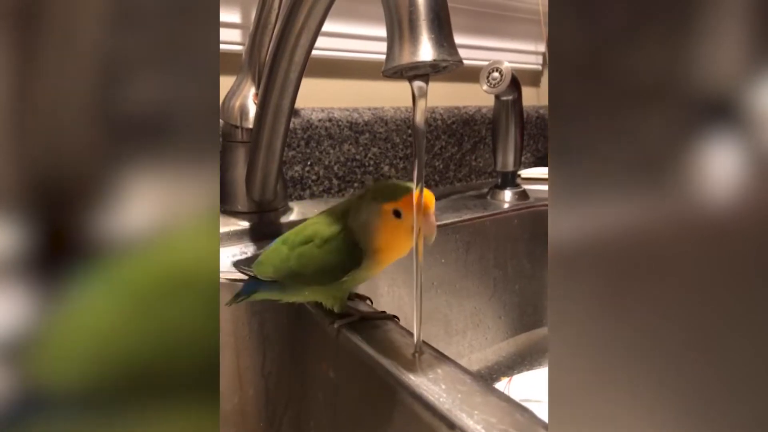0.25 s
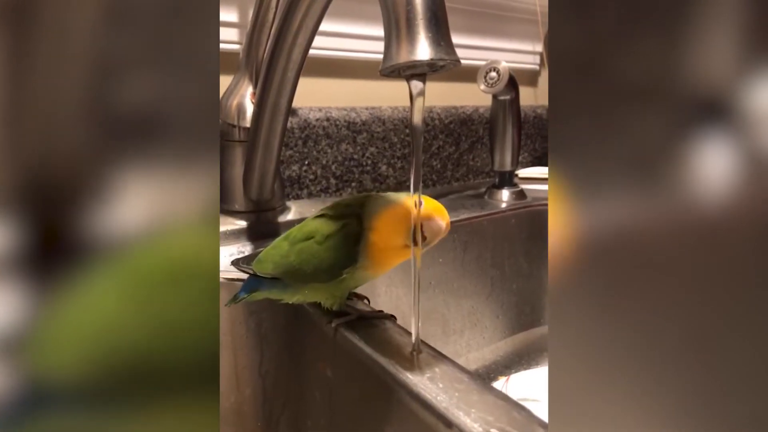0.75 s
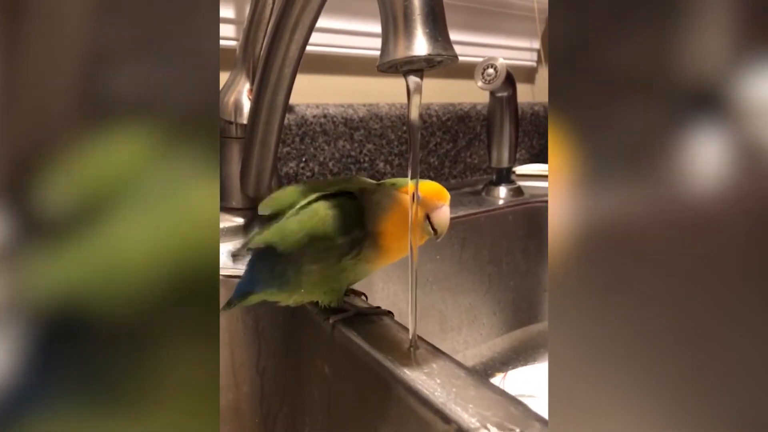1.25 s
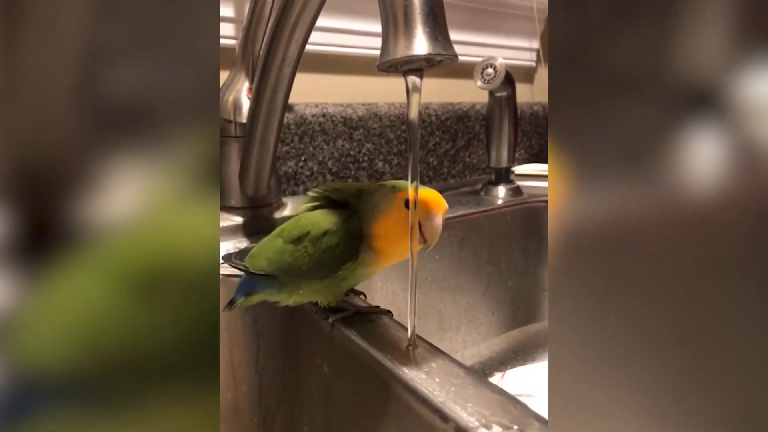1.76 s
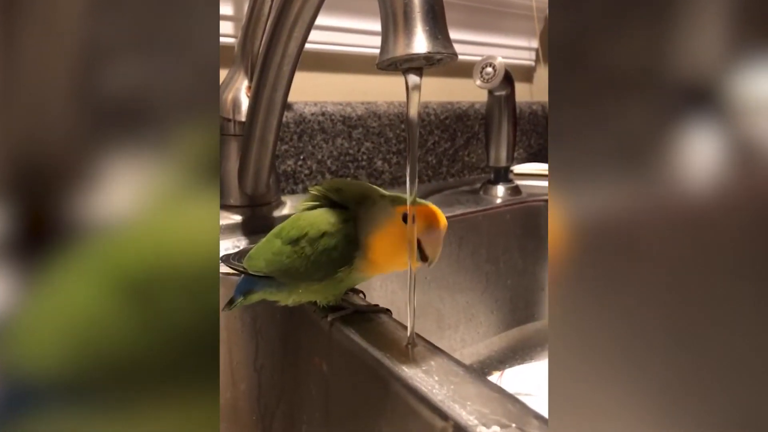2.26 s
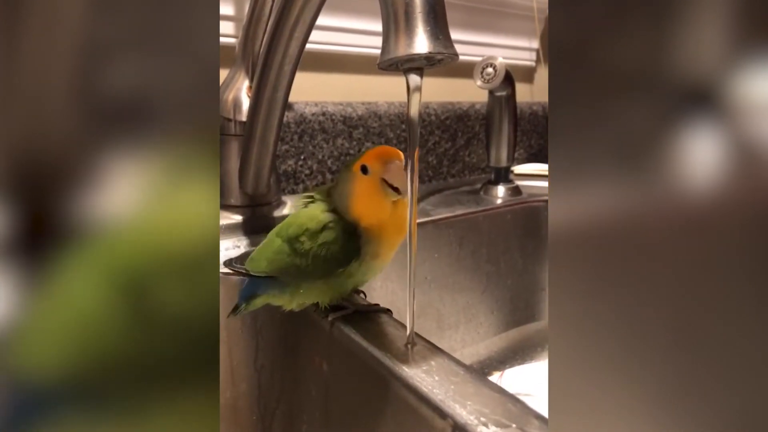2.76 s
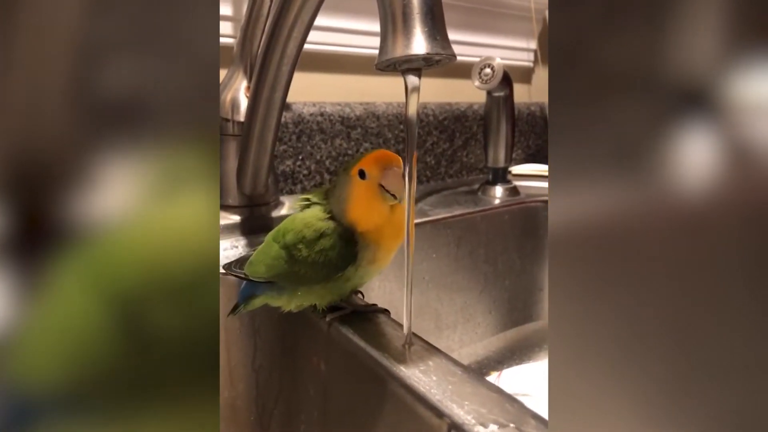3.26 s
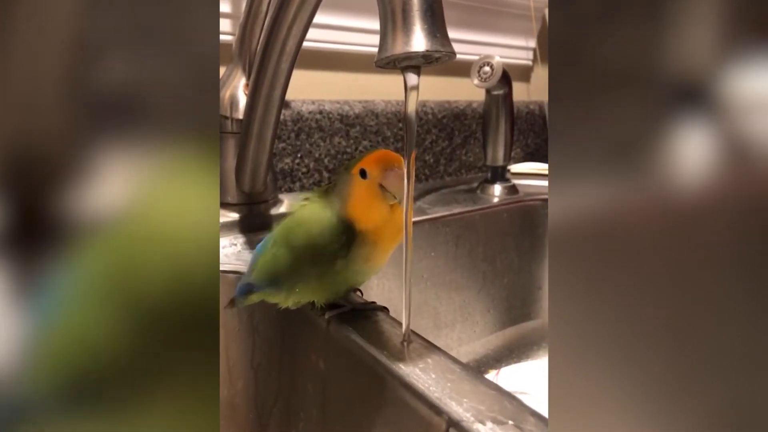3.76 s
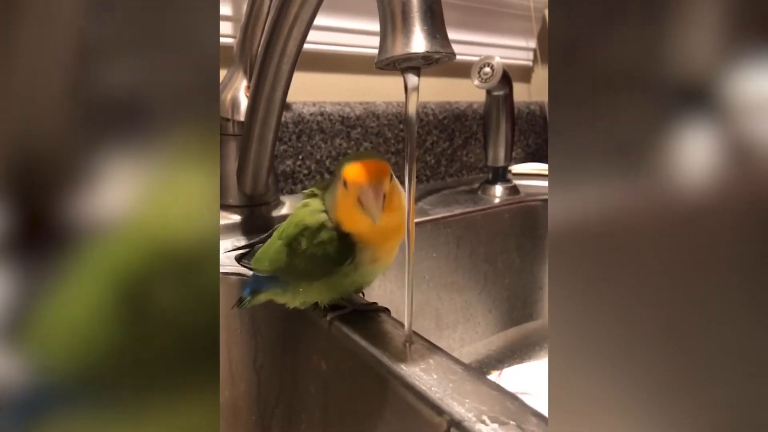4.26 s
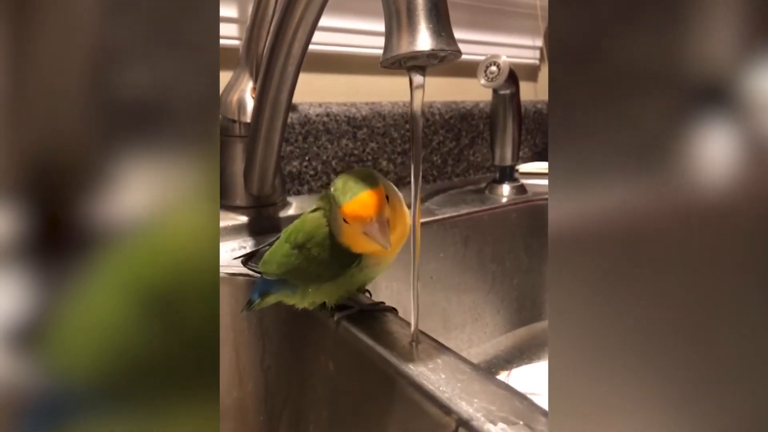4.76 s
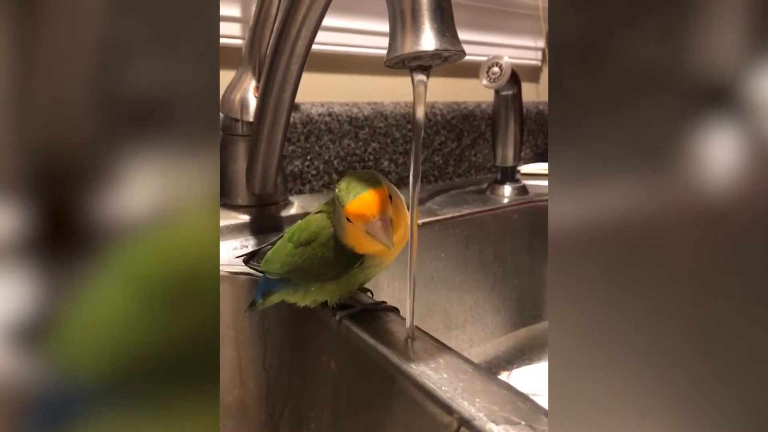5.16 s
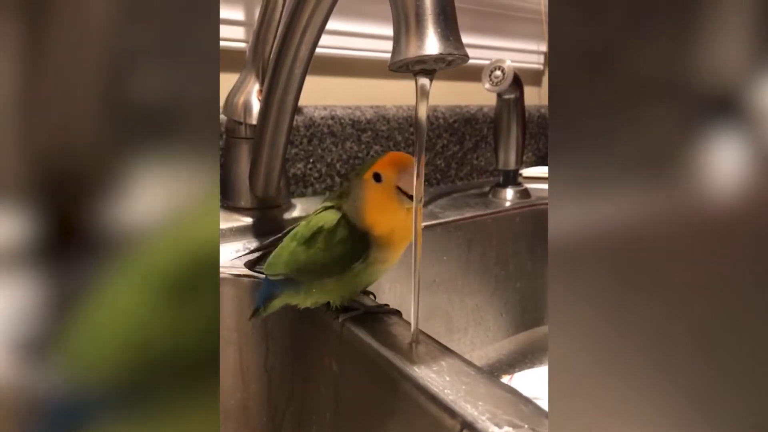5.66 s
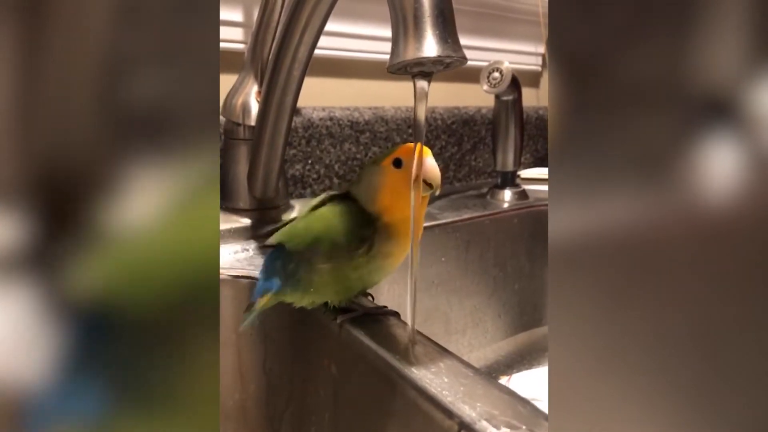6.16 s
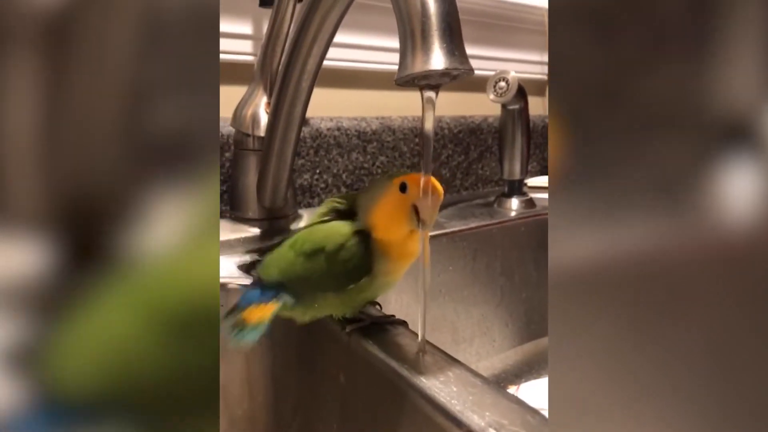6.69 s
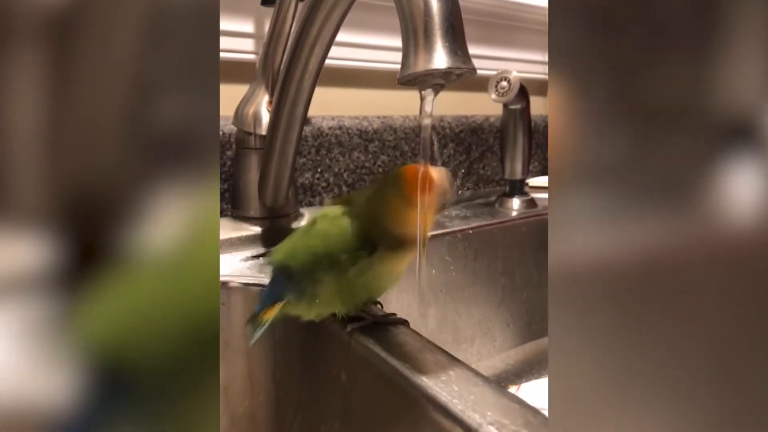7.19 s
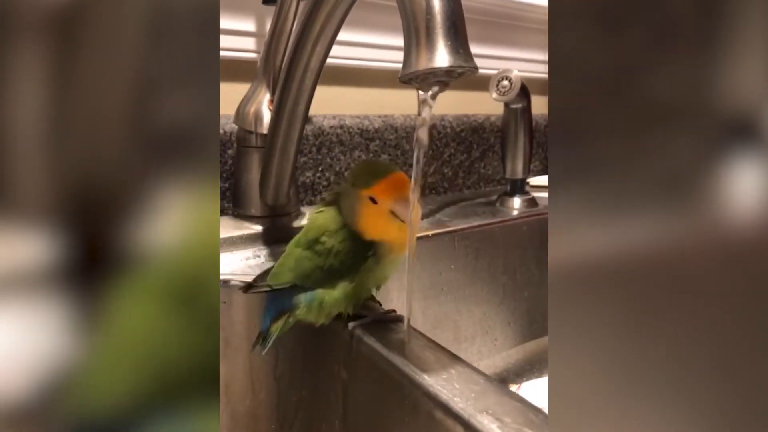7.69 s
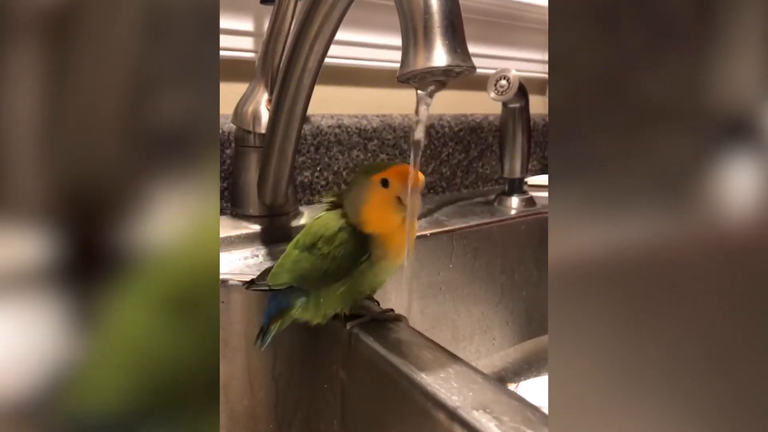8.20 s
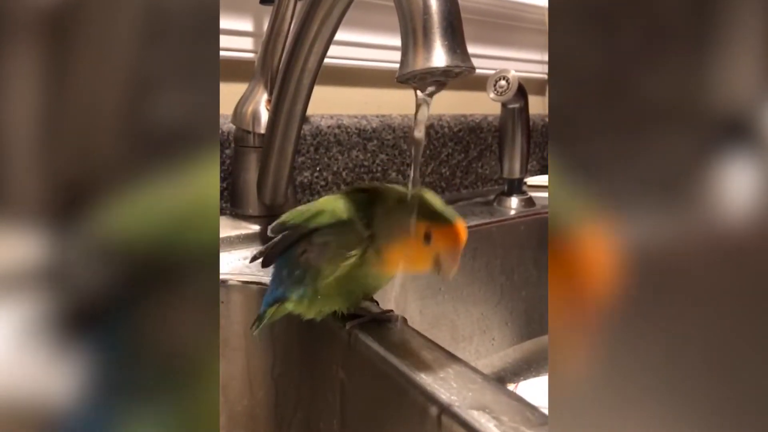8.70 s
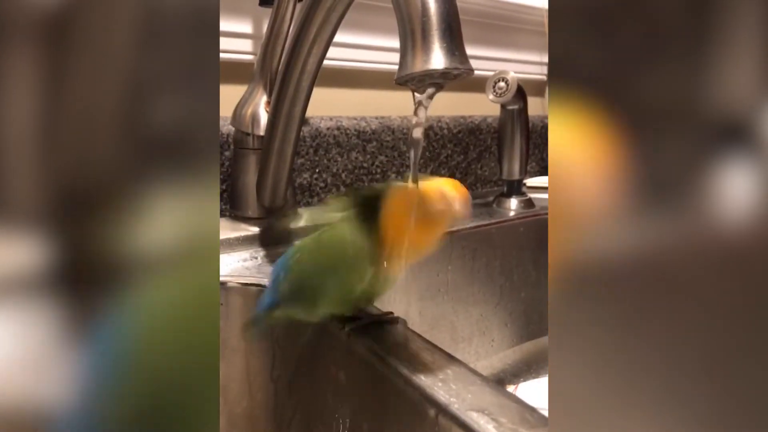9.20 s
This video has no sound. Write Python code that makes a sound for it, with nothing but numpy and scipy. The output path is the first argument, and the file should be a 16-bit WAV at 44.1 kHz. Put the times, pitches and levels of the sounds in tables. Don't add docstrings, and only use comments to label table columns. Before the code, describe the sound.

A thin tap stream runs on a steel kitchen sink rim, picked up close by a muffled camera microphone, so water is mostly low rumble around 20 to 50 Hz with dull, soft patter and very faint hiss. Jolts of the steel become short thumps sweeping quickly from mid to low pitch, like a blunt pew. Small ones come at 0.4 and 1.2 s, firmer ones at 1.7 and 2.1, a hard one at 2.9, another at 3.9, the hardest at 4.2. From 4.2 to 7.0 they crowd irregularly, notably 4.8, 5.35, 5.65, 6.3, 6.45 and 6.75. Hiss jumps for about 60 ms after several hard blows, longer at 6.6. Rumble swells around 6.5, then eases; thumps return at 8.15 and 8.3, with light bumps after. Tiny ticks at 0.75 and 2.24; at 9.2 a tick and brief dropout, then quiet rumble.

```python
import sys
import numpy as np
from scipy import signal
from scipy.fft import rfft, irfft, next_fast_len
from scipy.io import wavfile
from scipy.ndimage import uniform_filter1d, minimum_filter1d, map_coordinates

SR = 44100
rng = np.random.default_rng(int(sys.argv[2]) if len(sys.argv) > 2 else 0)


def ratio_of_db(decibels):
    return 10 ** (np.asarray(decibels, float) / 20)


def materialize(psi):
    bounded = np.clip(np.atleast_2d(psi).T, -1, 1)
    quanta = np.round(bounded * 32767).astype(np.int16)
    wavfile.write(sys.argv[1], SR, quanta)


N = 416304


def unit(x):
    return x / np.sqrt(np.mean(x ** 2) + 1e-20)


def along(points, hz):
    f, v = np.transpose(points)
    return np.interp(np.log(hz + 1), np.log(f + 1), v)


def filtered(x, response):
    size = next_fast_len(N + SR // 2)
    hz = np.fft.rfftfreq(size, 1 / SR)
    return irfft(rfft(x, size) * response(hz), size)[:N]


def noise(spectrum):
    white = rng.standard_normal(N)
    return unit(filtered(white, lambda hz: ratio_of_db(along(spectrum, hz))))


def bump(t, ms, order=1):
    u = np.maximum(t, 0) / (ms / 1000)
    return (u * np.exp(1 - u)) ** order


# pitch_hz, level_db
PORT = [(15, -1.3), (40, 1.8), (100, 1), (250, 1.68), (480, -2.1), (650, -7.5), (900, -1), (1600, -6),
        (2600, -14)]


def pickup(hz, bass_hz=41, damping=1.274, top_hz=300):
    s = 1j * hz
    bass = s * s / (s * s + s * bass_hz * damping + bass_hz ** 2)
    top = (top_hz / (top_hz + s)) ** 4
    return bass * top * ratio_of_db(along(PORT, hz))


# start_s, pull_db, pull_rise_ms, slow_push_height (signed)
BREAKS = [(0.4007, -40, 0.3, -.072), (1.201, -28, 0.33, .16), (1.286, -20, 0.72, -0.022),
          (1.6598, -4.5, 2.5, 0.00042), (2.0853, -4, 2.15, -0.21), (2.9446, 0.1, 0.96, 0.48),
          (3.3455, -21.5, 2.6, -.087), (3.4177, -33.5, 2.1, -.033), (3.8804, -9.5, 0.37, 0.4),
          (4.2184, 2.9, 1.2, 0.64), (4.247, -7.5, 2.9, 0.12), (4.3024, -17, 2.4, -0.23),
          (4.6104, -8, 3.3, -0.073), (4.8325, 1, 0.44, 0.0082), (4.856, -2, 0.33, -0.17),
          (5.1012, -7.5, 0.78, 0.046), (5.128, -16, 0.62, -0.12), (5.3487, -0.8, 0.43, 0.15),
          (5.486, -4.5, 0.77, -0.014), (5.6585, -3, 1.7, -0.18), (5.786, -10.5, 0.92, -0.11),
          (6.3003, -23, .21, .016), (6.3178, -1, 0.57, -0.38), (6.4071, -12.5, 0.34, 0.25),
          (6.4373, -2, 2.9, -0.53), (6.6798, -27, .58, .1), (6.748, -4, 0.62, 0.26),
          (7.025, -15.5, 2.9, -0.28), (8.1553, -2.5, 3.3, -0.41), (8.281, -4.5, 3, 0.093)]
# start_s, pull_db,
# slow_push_height (signed), rim_knock_db
WEAK_BREAKS = [(0.021, -57, -0.23, -48.5), (0.7006, -28.5, 0.015, -62), (0.945, -36.5, 0.1, -66),
               (1.7108, -46, -0.1, -66), (2.9131, -35.5, -0.073, -56.5), (3.5827, -40.5, 0.027, -59),
               (4.1896, -24.5, 0.23, -44.5), (4.3944, -27.5, 0.044, -47.5), (4.4386, -32.5, -0.021, -50.5),
               (4.4992, -31, -0.014, -49), (4.5738, -40, .053, -64), (4.9847, -37.5, 0.11, -73),
               (6.0504, -40, 0.1, -51), (6.532, -34, 0.19, -60), (6.5621, -28, 0.4, -60),
               (7.0969, -34, 0.02, -42), (7.133, -29, 0.08, -63), (7.176, -56, .01, -54),
               (7.206, -45.5, .01, -57), (7.1381, -44.5, 0.23, -67), (8.2614, -27.5, 0.066, -61),
               (8.3638, -31, 0.00034, -66.5), (8.4869, -35.5, 0.031, -67), (8.5185, -25.5, 0.1, -63),
               (8.631, -36.5, 0.027, -60), (9.1037, -36, -0.12, -66)]


def contacts(weak_rise_ms=1.3):
    return BREAKS + [(s, db, weak_rise_ms, push) for s, db, push, _ in WEAK_BREAKS]


def jolts(slow_ms=5.08):
    out, steps = np.zeros(N + SR), np.arange(SR // 10)
    for s, pull_db, rise_ms, push in contacts():
        start = int(s * SR)
        t = (start + steps) / SR - s
        pull = ratio_of_db(pull_db) * bump(t, rise_ms)
        out[start:][:len(t)] -= pull + push * bump(t, slow_ms, order=2)
    return filtered(out[:N], pickup)


def knocks(rows, cycles):
    out, t = np.zeros(N), np.arange(SR // 30) / SR
    for s, db, hz in rows:
        swell = bump(t, 1000 * cycles / hz, order=2)
        out[round(s * SR):][:len(t)] -= ratio_of_db(db) * swell * np.sin(2 * np.pi * hz * t)
    return out


# start_s, peak_db, pitch_hz
KNOCKS = [(0.006, -43, 330), (0.4008, -45, 287), (1.2858, -44.5, 380), (1.6598, -27, 232),
          (2.0862, -24.5, 284), (2.9455, -17.5, 263), (3.3456, -43.5, 250), (3.4209, -48.5, 237),
          (3.8821, -25, 277), (4.2193, -16, 264), (4.2485, -36, 294), (4.3032, -32.5, 256),
          (4.6118, -41.5, 334), (4.8335, -31, 298), (4.8563, -28.5, 272), (5.1029, -42, 325),
          (5.1276, -40.5, 356), (5.4861, -35, 417), (5.6626, -24, 262), (6.3177, -23, 348),
          (6.4071, -49, 373), (6.4357, -32.5, 350), (6.558, -44.5, 520), (6.7469, -36.5, 420),
          (7.0232, -39, 360), (7.1389, -43, 273), (8.1567, -24.5, 263), (8.2812, -28, 366),
          (8.367, -37.5, 312), (8.5197, -41, 247)]
# start_s, peak_db, pitch_hz
CRACKS = [(0.024, -55, 845), (1.658, -67, 840), (2.085, -46, 800), (2.085, -62, 1620), (2.944, -43.5, 850),
          (3.882, -58, 850), (3.882, -59, 1650), (4.218, -42.5, 860), (4.303, -58, 850), (4.609, -48, 507),
          (4.832, -52, 850), (4.854, -69.5, 857), (5.348, -71.5, 850), (5.486, -56.5, 854),
          (5.662, -58.5, 785), (6.318, -50.5, 850), (6.436, -62, 850), (6.747, -59, 850), (7.023, -62, 850),
          (7.133, -60, 700), (8.156, -64, 800), (8.28, -65.5, 850)]


def rim(weak_knock_hz=350, dull_hz=620):
    rows = KNOCKS + [(s, db, weak_knock_hz) for s, *_, db in WEAK_BREAKS]
    dull = filtered(knocks(rows, cycles=0.55), lambda hz: 1 / np.sqrt(1 + (hz / dull_hz) ** 6))
    return dull + knocks(CRACKS, cycles=1.0)


def sway(depth_db=1.92, per_second=14):
    knots = rng.standard_normal(200)
    return depth_db * map_coordinates(knots, [np.arange(N) * per_second / SR])


# start_s, force_db, spray_over_force_db
FLOW = [(0.0, -27.5, -23.5), (0.42, -34, -24.5), (1.08, -35, -15.5), (1.84, -32.5, -30.5),
        (2.44, -35, -19.5), (2.76, -33.5, -23.5), (3.92, -35.5, -22), (4.23, -34.5, -21.5),
        (5.73, -33.5, -22), (6.1, -36.5, -16), (6.31, -38, -6.5), (6.52, -25, -18.5), (7.13, -31.5, -19),
        (7.31, -35, -17), (7.94, -34.5, -23.5), (8.23, -34.5, -22), (8.68, -37.5, -18), (9.44, -38.5, -10)]


def flow(per_second=90, spread_db=1.8, ms=.9):
    s, force_db, spray_db = np.transpose(FLOW)
    t = np.arange(N) / SR
    draw = rng.random((1500, 2))
    when = np.cumsum(-np.log(draw[:, 0]) / per_second)
    size = ratio_of_db(-spread_db * np.log(draw[:, 1])) * (when < N / SR)
    places = np.minimum(when * SR, N - 1).astype(int)
    drops = np.bincount(places, -size, N)
    patter = filtered(signal.fftconvolve(drops, bump(t[:2048], ms))[:N], pickup)
    level_db = np.interp(t, s, force_db + spray_db) + sway() - 5.0
    return ratio_of_db(level_db) * unit(patter)


def steadied(x, firmness):
    power = uniform_filter1d(uniform_filter1d(x ** 2, size=1800), size=1800)
    level = np.sqrt(np.abs(power) + 1e-9)
    return unit(x / level ** firmness)


# pitch_hz, level_db (per Hz)
RUMBLE = [(7, -39), (12, -8.5), (20, -1.5), (30, -0.4), (41, 1.5), (55, -6.5), (75, -17.5), (105, -22),
          (140, -28.5), (265, -50.5), (600, -64.5), (800, -88), (1300, -120)]


def rumble(ceiling_db=-22, shudder_db=-26, shudder_ms=24):
    s, force_db, _ = np.transpose(FLOW)
    t = np.arange(N) / SR
    shudder = sum(ratio_of_db(db + shudder_db) * bump(t - when, shudder_ms) for when, db, *_ in BREAKS)
    steady = ratio_of_db(np.interp(t, s, force_db) + sway())
    level = np.minimum(np.hypot(steady, shudder), ratio_of_db(ceiling_db))
    return level * steadied(noise(RUMBLE), firmness=.25)


# stages, corner_hz
SHIFTERS = [(4, 59.2), (3, 163.2)]


def smear(hz):
    return np.exp(-2j * sum(stages * np.arctan(hz / corner) for stages, corner in SHIFTERS))


# pitch_hz, level_db (per Hz)
HISS = [(100, -1.5), (500, 2.5), (1000, -1), (2000, -4.5), (4000, -7.5), (7000, -11.5), (11500, -18),
        (13500, -28), (15500, -38.5)]
# start_s, end_s, extra_hiss_db
COARSE = [
    (2.945, 3.002, 12.5),
    (4.249, 4.309, 13.5),
    (5.659, 5.718, 12),
    (6.315, 6.375, 12),
    (6.437, 6.494, 12.5),
    (6.559, 6.686, 12.5),
    (9.099, 9.147, -2),
]


def hiss(level_db=-75, fine_top_hz=12000):
    t = np.arange(N) / SR
    coarse = sum(ratio_of_db(db) * ((t > start) & (t < end)) for start, end, db in COARSE)
    fine = filtered(noise(HISS), lambda hz: hz < fine_top_hz)
    return ratio_of_db(level_db) * (fine + uniform_filter1d(coarse, size=128) * noise(HISS))


# start_s, step_db
TICKS = [
    (.7549, -45),
    (2.2409, -42.5),
    (9.2064, -53),
]


def ticks(heal_ms=4.5):
    out, t = np.zeros(N), np.arange(SR // 20) / SR
    for s, db in TICKS:
        out[round(s * SR):][:len(t)] += ratio_of_db(db + 1) * np.exp(-t / (heal_ms / 1000))
    return out


def limited(x, ceiling=.345):
    need = np.minimum(1, ceiling / (np.abs(x) + 1e-9))
    return x * uniform_filter1d(minimum_filter1d(need, size=600), size=600)


# start_s, sag_before_s, silence_s, fade_in_s
DROPOUT = (9.2064, .012, .006, .014)


def dropout(settle_s=.06):
    s, sag, silence, fade = DROPOUT
    t = np.arange(N) / SR
    going = np.clip((s - t) / sag, 0, 1)
    settling = np.clip((t - s - silence) / settle_s, 0, 1)
    back = np.clip((t - s - silence) / fade, 0, 1)
    return np.maximum(going, settling), np.maximum(t < s, back)


def scene():
    return (jolts() + rim() + flow())[None]


def top_cut(x):
    return signal.sosfilt(signal.butter(12, 14900, fs=SR, output="sos"), x)


def record(dry):
    shaking = limited(filtered(dry[0], smear) + rumble())
    sound_gain, hiss_gain = dropout()
    wired = shaking * sound_gain + hiss() * hiss_gain + ticks()
    wired = wired * np.clip(np.arange(N) / SR / .004, 0, 1)
    return top_cut(wired[None])


dry = scene()
out = record(dry)
materialize(out)
```